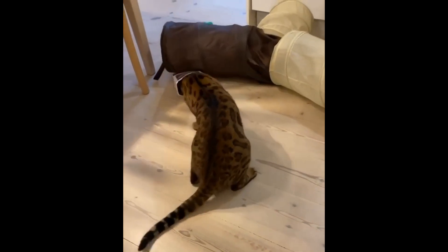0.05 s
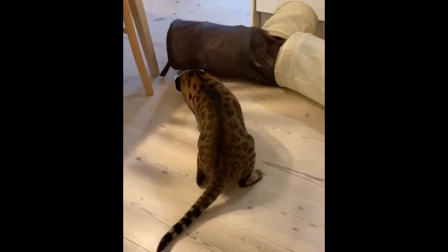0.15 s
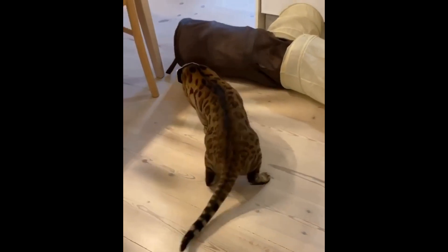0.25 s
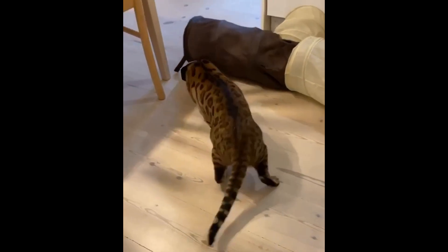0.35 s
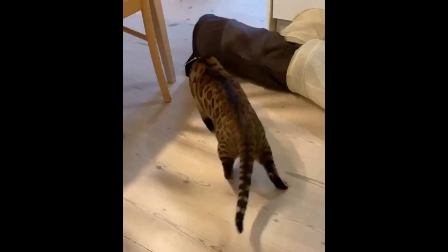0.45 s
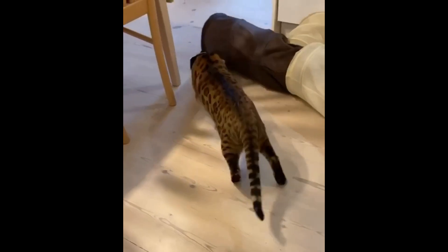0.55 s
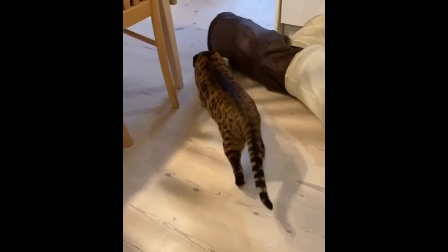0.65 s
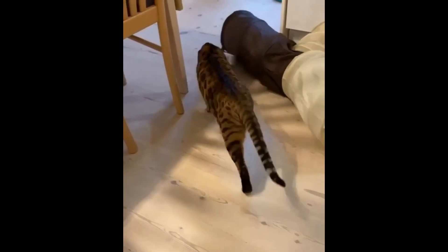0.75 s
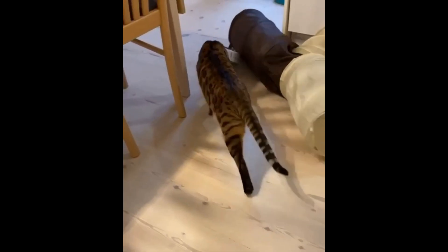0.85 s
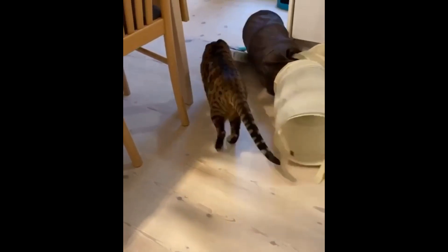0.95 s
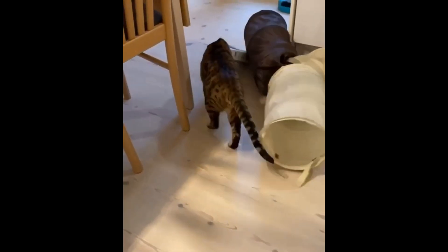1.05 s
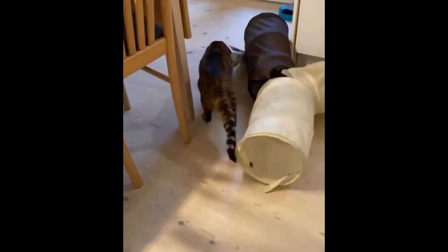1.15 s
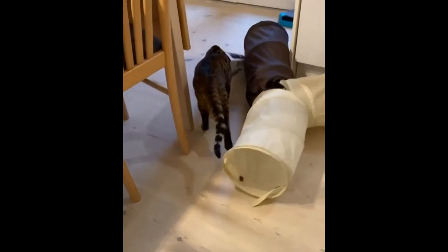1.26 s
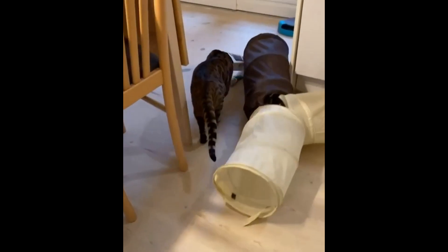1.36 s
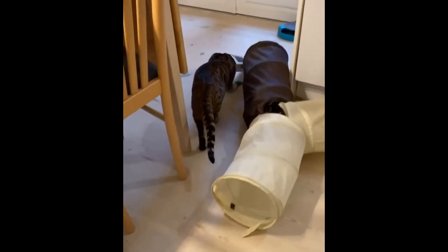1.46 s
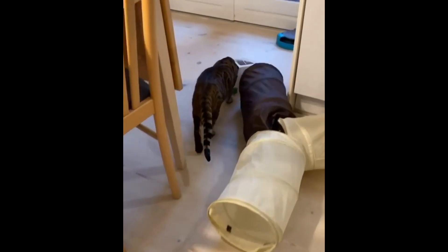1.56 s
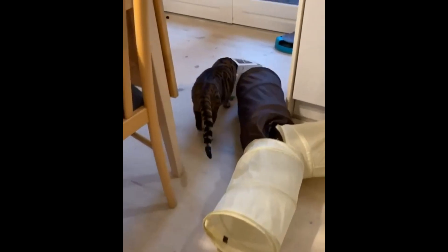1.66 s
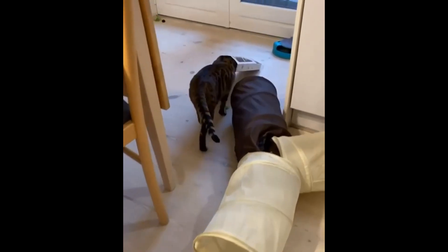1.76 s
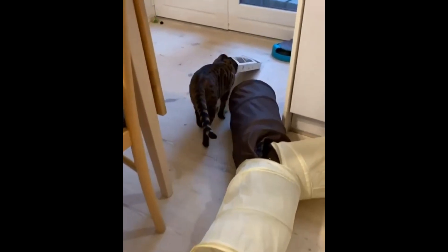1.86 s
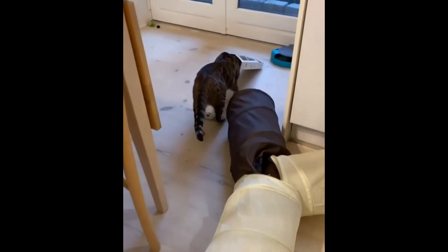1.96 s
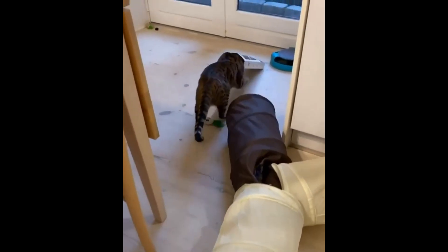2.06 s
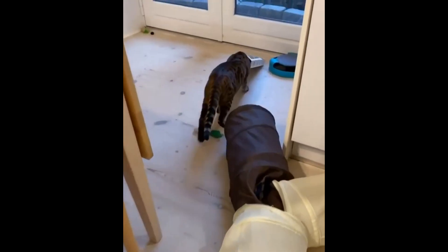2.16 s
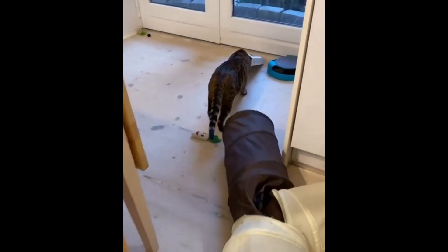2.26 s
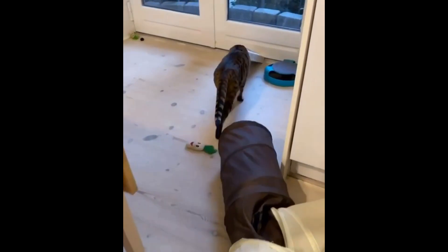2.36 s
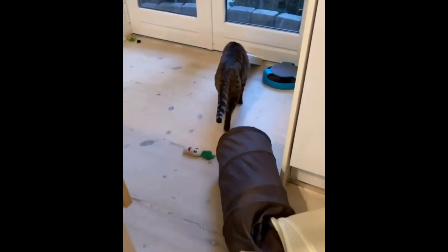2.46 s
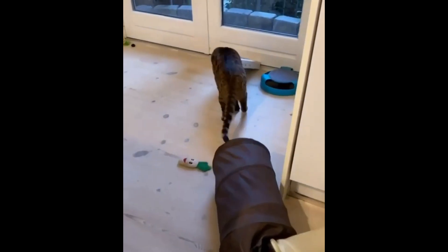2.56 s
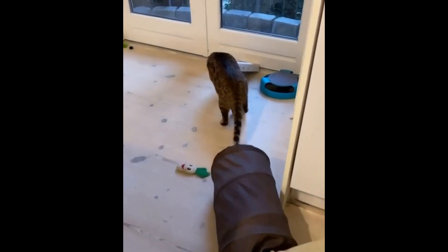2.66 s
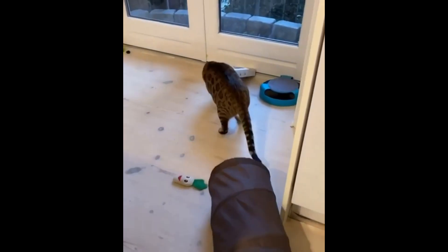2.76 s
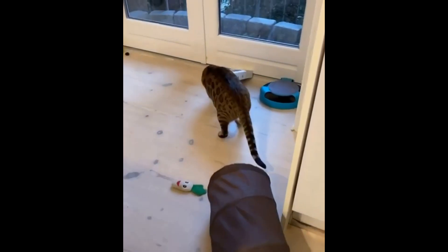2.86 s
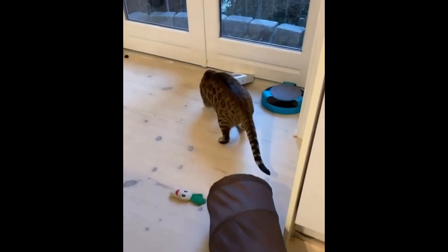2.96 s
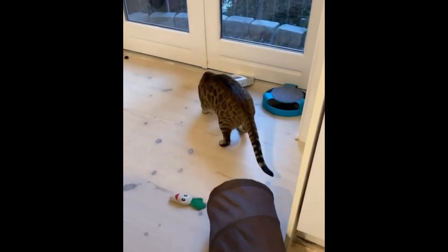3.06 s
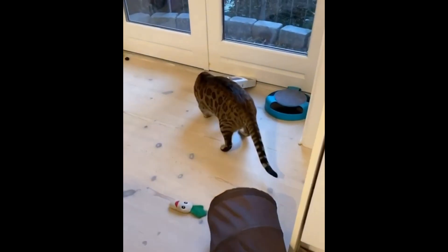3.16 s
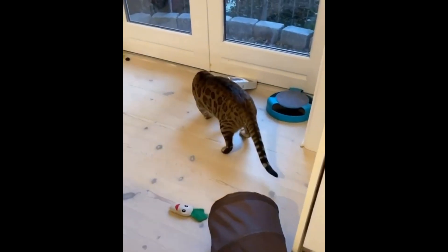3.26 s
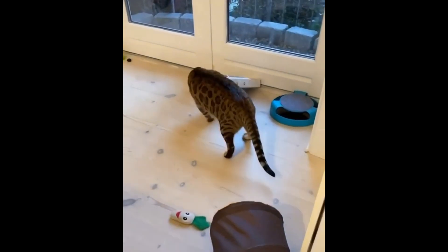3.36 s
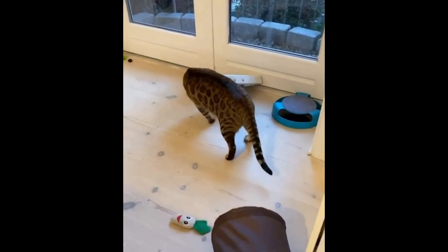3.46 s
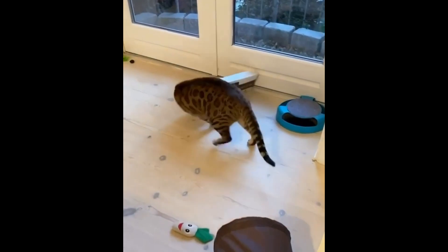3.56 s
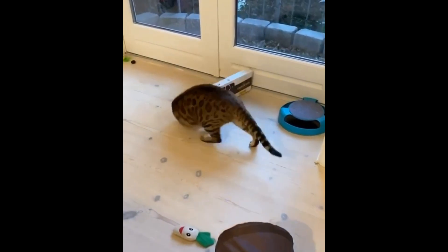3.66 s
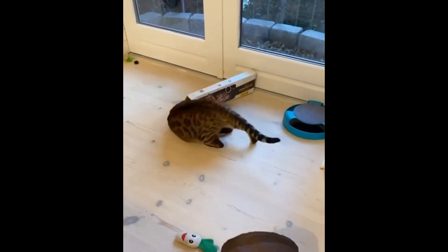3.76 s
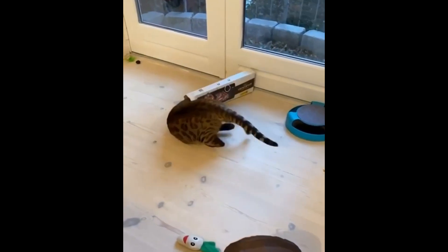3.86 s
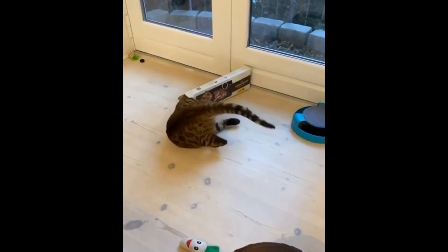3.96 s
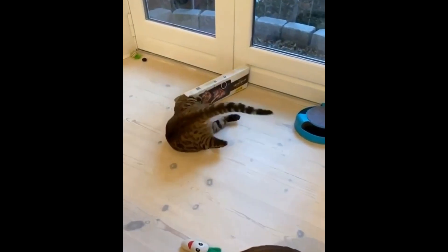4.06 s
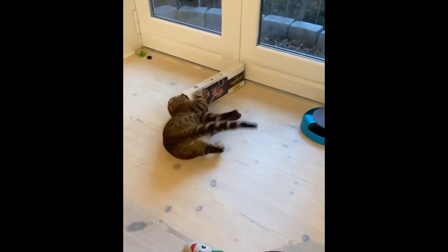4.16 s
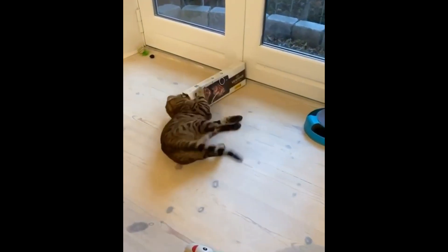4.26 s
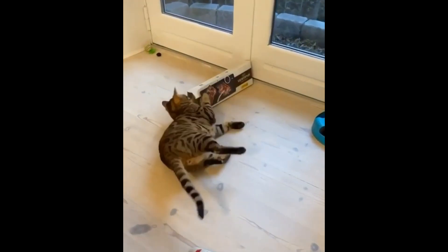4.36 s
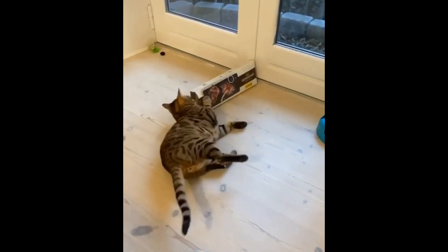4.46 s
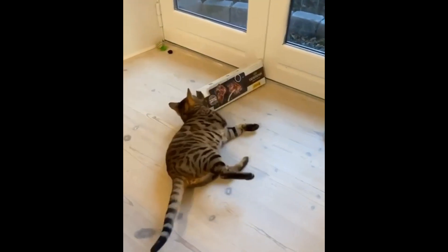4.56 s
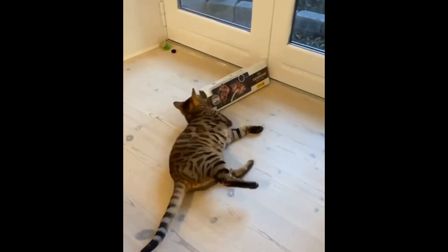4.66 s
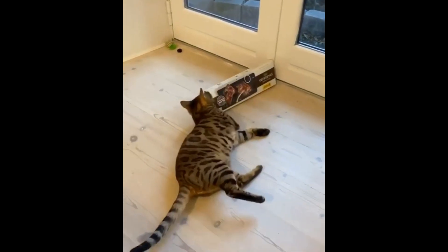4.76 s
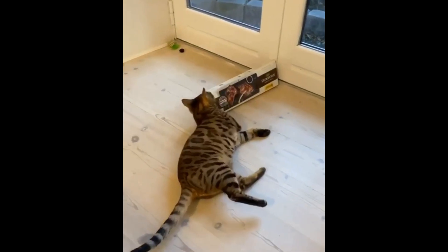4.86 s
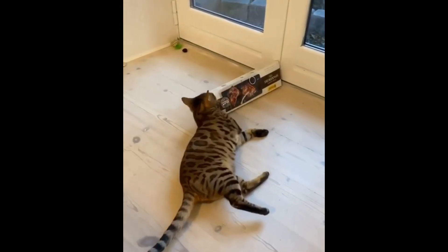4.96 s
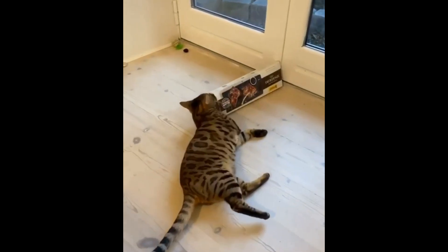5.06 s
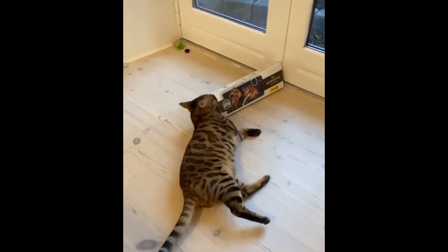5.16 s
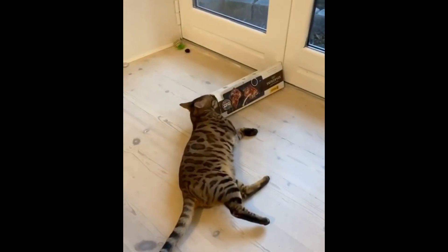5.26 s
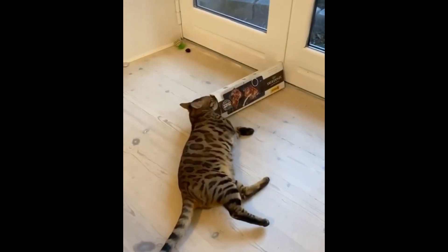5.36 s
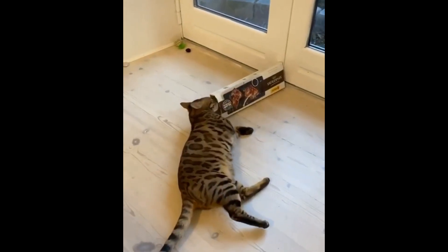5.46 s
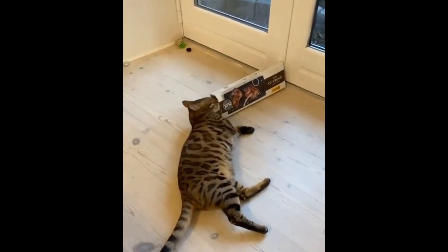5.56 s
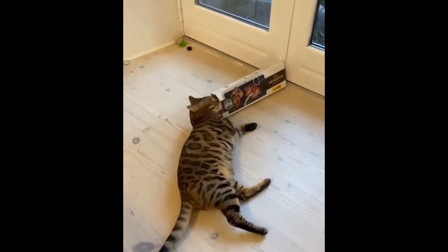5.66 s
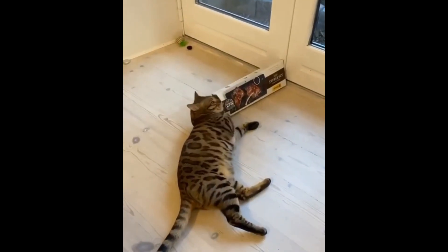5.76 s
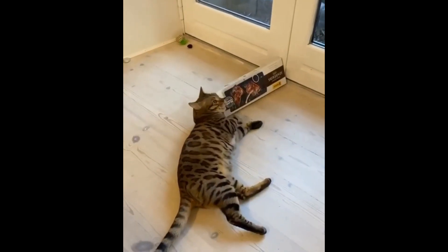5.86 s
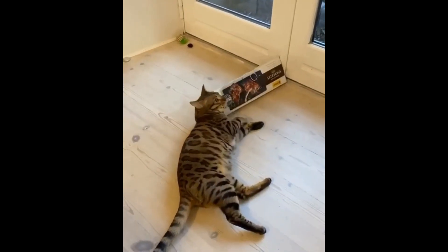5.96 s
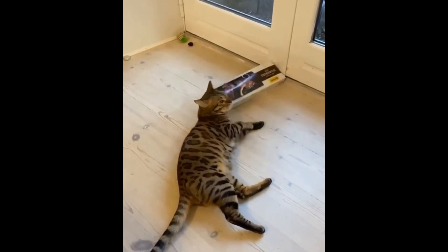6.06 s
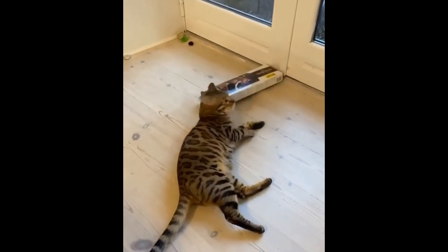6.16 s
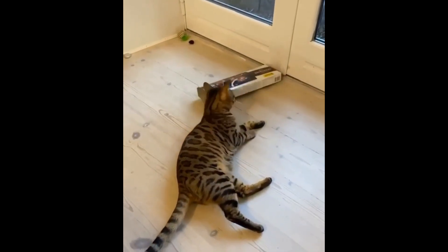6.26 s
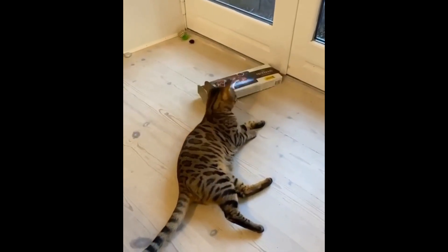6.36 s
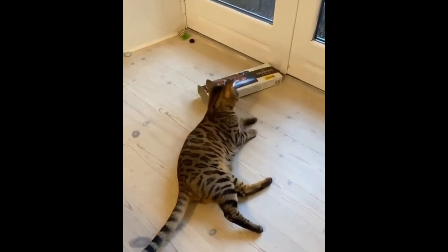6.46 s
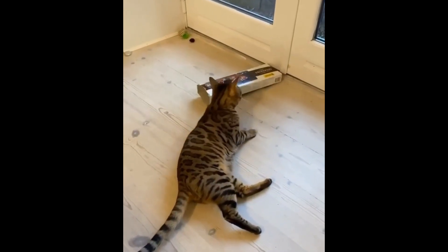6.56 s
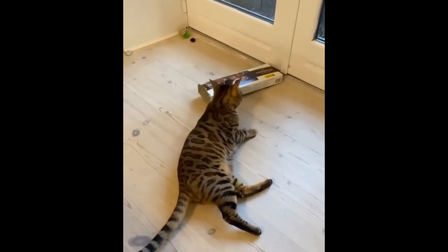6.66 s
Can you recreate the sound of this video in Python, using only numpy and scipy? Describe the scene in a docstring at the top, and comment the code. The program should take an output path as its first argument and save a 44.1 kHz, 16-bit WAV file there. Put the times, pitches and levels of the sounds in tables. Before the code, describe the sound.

A cat shoves a cardboard box across a wooden floor indoors, with soft scuffs, paw thuds and separate hollow knocks.

```python
"""A bare, lively room with a wooden floor, where a cat shoves a flat cardboard box past a fabric tunnel.
The box scuffs along in stick-slip strokes, knocks down on the boards, hits a door and topples over:
each hit is a dead slap, with the hollow body and the floor ringing under it. Paws thud, claws tick
on the card, fur and fabric rustle, all over a bed of room air and a faint appliance hum."""
import sys
import numpy as np
from scipy import signal
from scipy.fft import rfft, irfft
from scipy.io import wavfile
from scipy.ndimage import uniform_filter1d

SR = 44100
rng = np.random.default_rng(int(sys.argv[2]) if len(sys.argv) > 2 else 0)


def transcribe(signal):
    """Save signal, clipped to [-1, 1], as a 16-bit WAV file at the path in sys.argv[1]."""
    frames = np.atleast_2d(signal).T
    limited = np.clip(frames, -1, 1)
    pcm = np.round(limited * 32767).astype(np.int16)
    wavfile.write(sys.argv[1], SR, pcm)


N = 296352

# box hits: t/s, slap level/dB, treble corner/Hz, roll-off order, contact/s, floor ring/dB,
# body ring/dB, body focus/Hz
KNOCK_CUES = [(0.7303, -14, 2000, 2, 0.027, -72, -42, 475), (.737, -16.5, 900, 2, 0.048, -75, -37.5, 154),
              (0.802, -22.5, 1950, 2, 0.014, -59, -61, 170), (1.67, -21, 3440, 2, 0.0071, -44, -49, 600),
              (1.678, -11, 3500, 2.6, 0.0055, -36, -57, 600), (1.693, -16, 2350, 2, 0.016, -49, -30, 334),
              (2.483, -9, 1060, 2, 0.024, -46, -29.5, 201), (2.489, -7, 950, 1.8, 0.011, -53, -31.5, 122),
              (2.515, -12, 900, 2, 0.0041, -33.5, -29.5, 406),
              (2.898, -28.5, 1810, 2, 0.0044, -65, -52, 336),
              (3.7467, -4.5, 2800, 4, 0.0032, -47, -41, 1700),
              (3.7548, 2.5, 1250, 2.8, 0.0035, -29, -18.5, 617),
              (3.755, -11, 706, 3, 0.0059, -42, -27, 252),
              (3.777, -5.5, 2180, 3.8, 0.03, -25.5, -18.5, 161),
              (3.824, -20, 890, 3, 0.0052, -59, -28, 591), (6.153, -27, 3630, 2, 0.011, -73, -45.5, 1614),
              (6.251, -41, 800, 2, 0.0051, -60, -36.5, 184), (6.263, -14.5, 5500, 2, 0.0042, -63, -24, 340),
              (6.283, -11.5, 3380, 2, 0.0064, -42, -24.5, 415),
              (6.292, -29, 700, 2, 0.0093, -41, -36.5, 162), (6.309, -12.5, 2170, 2, 0.026, -40, -28, 258),
              (6.5229, -17.5, 950, 4, 0.0022, -69, -47, 740),
              (6.538, -13.5, 495, 3, 0.0095, -66, -33.5, 330),
              (6.668, -47.5, 3000, 1.5, 0.0031, -68, -46.5, 325)]
# dead slap of card on wood: f/Hz, level/dB
SLAP_EQ = [(25, -25.5), (55, -31.5), (90, -4.5), (200, -2), (400, -3), (800, -4.5), (1500, -8.5),
           (3000, -11), (6000, -13), (9000, -15.5), (11500, -22), (12500, -37.5)]
# boxy colour on slaps, cracks and scratches: f/Hz, width/Hz, lift/dB
HOLLOW_PEAKS = [(560, 390, 3), (686, 87, 0.5), (970, 73, 2.5), (1190, 170, 1), (1860, 180, 2),
                (2060, 294, 1.5), (2600, 130, 1.5), (3200, 330, 0), (3650, 220, 1), (4170, 453, 0)]
# hollow body of the box: f/Hz, level/dB, t60/s
BODY_MODES = [(126, -2, 0.2), (156, 4, 0.19), (181.8, 0, 0.43), (196, -7.5, 0.41), (240, -2.5, 0.074),
              (259.8, -4, 0.2), (304, -15.5, 0.037), (338.3, 5.5, 0.14), (372, -7, 0.22),
              (399.4, -10, 0.24), (478.4, -11.5, 0.54), (522, -3, 0.15), (584, -20.5, 0.086),
              (599, -13, 0.25), (632.5, -2, 0.15), (679, -7.5, 0.26), (702, -5.5, 0.3), (750, 2.5, 0.18),
              (960, -14, 0.16), (1130, -2.5, 0.2), (1340, -5.5, 0.15), (1607, -2.5, 0.092)]
# floorboards: f/Hz, level/dB, t60/s
FLOOR_MODES = [(46.6, 5, 0.53), (75.7, 1.5, 0.42), (89.5, 4, 0.21), (107.1, 1.5, 0.16), (133.2, 2, 0.36),
               (161.2, -5, 0.3), (218, -4, 0.14), (244.7, -1.5, 0.19), (359, -25.5, .2)]
# corner hits: t/s, level/dB, f/Hz, width/octaves, card ring/dB, card focus/Hz
CRACK_CUES = [(0.7304, -20, 1210, 1.2, -45.5, 1790), (1.438, -25, 850, 0.4, -50, 816),
              (1.6777, -11, 2700, 0.42, -44, 3000), (1.69, -10.5, 3680, 0.58, -40.5, 1310),
              (2.488, -12, 875, 0.42, -40, 920), (2.857, -30.5, 2350, 1.06, -77, 2370),
              (2.896, -29, 2440, 1.4, -63, 2210), (3.7465, 6, 1420, 0.37, -42, 1500),
              (3.7585, -13.5, 3000, 0.44, -49.5, 2000), (3.770, -8, 1810, 0.51, -36.5, 1760),
              (3.824, -19, 700, 0.49, -34, 610), (6.158, -25, 1900, 0.52, -47, 1800),
              (6.1605, -14, 4900, 0.28, -60, 4150), (6.164, -30, 900, 0.33, -52, 870),
              (6.2622, -11, 1700, 1.8, -36, 740), (6.3003, -16, 2830, 0.87, -54, 3400),
              (6.3105, -18, 3920, 0.84, -43.5, 3200), (6.329, -21, 2500, 1.4, -42.5, 740)]
# stiff card panels: f/Hz, level/dB, t60/s
CARD_MODES = [(597, -4, 0.2), (674, 1, 0.39), (724, 2, 0.3), (787, 1, 0.24), (952, 6, 0.22),
              (1025, -5, 0.15), (1326, 2.5, 0.11), (1670, 0, 0.16), (1840, 0, 0.15), (2035, -1, 0.18),
              (2270, -4, 0.18), (2600, -5.5, 0.11), (3236, -1, 0.12), (4150, 0.5, 0.087)]
# the cat pushes the box: t/s, length/s, level/dB, swell/dB, grit relative to level/dB, pitch factor
SHOVE_CUES = [(-0.04, 0.4, -56.5, -2, -12.5, 0.93), (0.392, 0.17, -58, 5.5, -14, 0.95),
              (0.56, 0.13, -59, 4.5, -12, 0.85), (0.77, 0.28, -59, 5.5, -8.5, 0.9),
              (1.056, 0.12, -52, 4.5, -13, 0.91), (1.264, 0.16, -57.5, 5.5, -10.5, 1.05),
              (1.417, 0.082, -54, 0.5, -25, 0.87), (1.777, 0.27, -55, -15.5, -26, 0.91),
              (2.215, 0.65, -64.5, -16.5, -2.5, 1.02), (2.92, 0.091, -65, 5, -8, 1.12),
              (3.13, 0.034, -67, -1.5, -12, 1), (3.394, 0.38, -69.5, 18.5, -12.5, 0.96),
              (4.008, 0.085, -57, 1, -12.5, 0.93), (4.146, 0.16, -57, -8.5, -12.5, 0.9),
              (4.689, 0.06, -73, 5, -5.5, 0.86), (5.219, .04, -75.5, 4, -25, 0.92),
              (5.799, 0.94, -70.5, 5, -17.5, 0.98), (6.195, 0.07, -58.5, 3, -4.5, 1.56),
              (6.486, 0.065, -58, -2, -14, 0.78)]
# panel resonances of the sliding box: f/Hz, width/Hz, level/dB
SLIDE_BANDS = [(383, 220, -4), (595, 347, 4), (812, 242, 3.5), (1100, 550, -7)]
# fine scratch under the card: f/Hz, level/dB
SCRATCH_EQ = [(500, -7.5), (1100, 10), (1600, 7), (2500, 2), (4000, -3.5), (7000, -36)]
# single coarse grains: f/Hz, level/dB
GRIT_EQ = [(400, -11), (1200, -1), (3000, -3), (6000, -7), (11000, -16.5), (12500, -40)]
# boards under a load: f/Hz, level/dB
RUMBLE_EQ = [(25, -8), (55, -7), (90, 0.5), (150, -1.5), (250, -1), (400, -5.5), (700, -10.5), (2000, -53)]
# the card catches and judders: peak t/s, half length/s, level/dB, f/Hz, width/Hz, glide/(octaves/s)
SCUFF_CUES = [(0.495, 0.06, -58, 783, 98, 0.36), (0.726, 0.0065, -55, 1820, 2600, 0.52),
              (1.054, 0.0085, -57, 3200, 1300, 0), (1.059, 0.011, -67, 5400, 2000, 0),
              (1.125, 0.027, -50, 510, 130, 0.45), (1.158, 0.012, -47, 866, 290, -0.065),
              (1.447, 0.01, -46, 790, 310, -1.2), (1.485, 0.025, -56.5, 855, 300, -1.4),
              (2.512, 0.023, -56, 2930, 3700, -2), (2.99, 0.039, -65, 915, 88, -0.65),
              (3.172, 0.036, -63.5, 588, 149, -0.18), (3.532, 0.053, -62.5, 718, 131, 0.78),
              (3.699, 0.005, -53.5, 870, 410, 0), (4.071, 0.013, -51, 484, 130, -0.32),
              (4.6, 0.044, -82, 4500, 2600, -0.17)]
# the cat brushes past: t/s, length/s, level/dB, swell/dB, rumble of its weight/dB
BRUSH_CUES = [(-0.04, 0.42, -77, -7, -60.5), (0.33, 0.62, -76, 5.5, -71.5), (1.003, 0.26, -62, -3, -59),
              (1.263, 0.44, -73, 5, -65), (1.42, 0.03, -71, 0, -70), (1.82, 0.26, -75.5, -3, -61),
              (2.098, 0.13, -74, -0.5, -65), (2.227, 0.4, -75.5, 1.5, -58), (2.706, 0.25, -86, -2, -62.5),
              (2.872, 0.026, -68.5, -3, -54), (2.988, 0.4, -88, -8, -63.5), (3.315, 0.98, -82.5, 6.5, -72),
              (3.756, 0.11, -63, -6.5, -84), (4.21, 0.08, -69, -2.5, -60), (4.407, 0.26, -83.5, -4.5, -74),
              (4.678, 0.054, -79, 0.5, -69), (4.872, 0.047, -83.5, 0.5, -73.5),
              (5.233, 0.052, -90.5, 1.5, -83.5), (5.795, 0.14, -86.5, 5, -80.5),
              (5.942, 0.18, -75, 13, -93), (6.221, 0.05, -66, 6, -48), (6.645, 0.021, -74.5, 0.5, -65)]
# fur and tunnel fabric: f/Hz, level/dB
RUSTLE_EQ = [(1500, -22.5), (3500, -7), (5000, 1.5), (7000, 1), (9500, 1), (11600, -1.5), (12400, -30)]
# paw falls and body bumps: t/s, level/dB, focus/Hz
PAW_CUES = [(0.163, -61, 152), (0.482, -53, 163), (0.93, -54, 125), (1.031, -50, 154), (1.219, -47.5, 117),
            (1.627, -54, 129), (1.91, -52, 110.4), (2.256, -50, 245), (2.308, -46.5, 245), (2.66, -43, 235),
            (2.926, -45, 96), (2.99, -49.5, 180), (3.13, -57.5, 175), (3.441, -56, 176),
            (4.015, -45, 116.3), (4.07, -45, 125.7), (4.194, -42.5, 199), (4.249, -52, 161),
            (4.504, -56, 68.5), (4.793, -57.5, 80.6), (5.52, -59.5, 132), (6.425, -52, 131)]
# claws and card edges click: t/s, level/dB, focus/Hz
TICK_CUES = [(2.896, -61, 4350), (3.749, -41.5, 6900), (3.753, -44.5, 9400), (6.1589, -35.5, 4800),
             (6.161, -47, 9000), (6.2619, -30, 7750), (6.2636, -30.5, 5900), (6.267, -41, 8200),
             (6.273, -43, 7600)]
# stiff edge of the card: f/Hz, level/dB, t60/s
EDGE_MODES = [(3810, -16, 0.008), (4580, -4, 0.011), (4974, -3, 0.018), (5770, 0, 0.013),
              (6750, -3.5, 0.006), (7470, -3.5, 0.016), (8550, -5, 0.016), (9640, -1.5, 0.012),
              (10890, 14, 0.017), (11600, 8, 0.012), (12600, 3.5, 0.005)]
# still room air: f/Hz, level/dB
AIR_EQ = [(20, -26), (50, 2.5), (100, 0.5), (160, -6), (250, -9.5), (500, -11), (800, -19), (1500, -26.5),
          (5000, -35.5), (11500, -42.5)]
# appliance partials: f/Hz, level/dB
HUM_PARTIALS = [(150.7, -80), (301.5, -86), (597.5, -80)]
# reverb time of the room: f/Hz, t60/s
ROOM_DECAY = [(60, 0.59), (200, 0.41), (600, 0.47), (1500, 0.47), (4000, 0.5), (8000, 0.45), (12000, 0.19)]
# likeness of the two microphones: f/Hz, left-right correlation
STEREO_LIKENESS = [(60, 1), (190, 0.87), (290, 0.55), (500, -0.034), (1000, -0.25), (2000, 0.041),
                   (6000, 0.16), (9000, 1)]
# lean of the stereo image: f/Hz, left minus right/dB
LEFT_TILT = [(100, -1), (500, 1.76), (2000, 1), (4500, 2.5), (8000, 0.1)]


def knocks(crunch=1.44, slap_db=18, click_db=-33, uneven_db=4.5):
    """The box lands edge by edge: tiny impacts slap the floor, ring the body and shake the boards."""
    out, t = np.zeros((2, N)), np.arange(SR) / SR
    hz = np.fft.rfftfreq(4096, 1 / SR)
    for s, db, corner_hz, roll_off, contact_s, floor_db, body_db, focus_hz in KNOCK_CUES:
        impacts = sparse_noise(SR, per_s=3000) * np.exp(-t / contact_s)
        force = crunch * impacts / (np.linalg.norm(impacts) + 1e-9)
        force[0] += 1  # first contact
        hardness = np.hypot(1, hz / corner_hz) ** -roll_off + amp(click_db)
        slap = amp(db + slap_db + curve(SLAP_EQ, hz)) * hollow(hz) * struck_panel(hz) * hardness
        # the panels beam their treble unevenly towards the listener
        ripple = unit(uniform_filter1d(rng.standard_normal(len(hz)), size=24))
        beaming = amp(uneven_db * ripple * hz / (hz + 800))
        direct = signal.fftconvolve(force / np.linalg.norm(force), impulse(slap * beaming))
        add(out, s, amp(-5.5) * direct[None])
        # the reverb blooms more slowly after a long contact
        add(out, s, room(np.r_[impulse(slap), np.zeros(SR)], direct_db=-31, build_s=0.75 * contact_s))
        add(out, s, amp(body_db) * ring(BODY_MODES, focus_hz, reach=0.11, rise_s=0.0037))
        add(out, s, amp(floor_db) * ring(FLOOR_MODES, focus_hz=95, reach=0.46, rise_s=0.016))
    return out


def cracks(direct_db=-6.5):
    """A stiff corner strikes: a sharp crack, and the card panels ring on after it."""
    out, hz = np.zeros((2, N)), np.fft.rfftfreq(4096, 1 / SR)
    for s, db, centre_hz, octaves, ring_db, focus_hz in CRACK_CUES:
        band = np.exp(-(np.log2((hz + 1) / centre_hz) / octaves) ** 2) + amp(-39.5)
        crack = impulse(amp(db) * hollow(hz) * struck_panel(hz) * band)
        add(out, s, amp(direct_db) * crack[None])
        add(out, s, room(np.r_[crack, np.zeros(SR)], direct_db=-25.5))
        add(out, s, amp(ring_db) * ring(CARD_MODES, focus_hz, reach=0.25, rise_s=0.001))
    return out


def hollow(hz):
    """Gain of the broad peaks that make the card sound boxy."""
    return amp(sum(db / (1 + (2 * (hz - centre) / width) ** 2) for centre, width, db in HOLLOW_PEAKS))


def struck_panel(hz, depth_db=3, above_hz=900):
    """A fresh EQ per hit: each spot on the card wakes its own crowd of small, damped resonances."""
    peaks = unit(uniform_filter1d(uniform_filter1d(rng.standard_normal(len(hz)), size=12), size=8))
    return unit(amp(depth_db * peaks * hz / np.hypot(hz, above_hz)))


def strokes():
    """Stick-slip drives panels and boards; grit scratches under the card, fur and fabric rustle."""
    slide_gain, rustle_gain, scratch_gain, rumble_gain, pitch = movements()
    chatter = moving_room(slips(per_s=900, spread_db=1.5), direct_db=-14)
    panels = sum(amp(db) * resonate(chatter, hz * pitch, width) for hz, width, db in SLIDE_BANDS)
    texture, grip = crackle(), flutter()
    scrape = irfft(rfft(colour(texture, SCRATCH_EQ)) * hollow(bins(texture)), N)
    grains = room(colour(slips(per_s=240, spread_db=-1), GRIT_EQ), direct_db=-12.5)
    # a tighter grip ducks the scrape and lifts the rustle a touch
    scratch = unit(amp(-2 * grip) * scrape) + amp(-3.5) * unit(grains)
    rustle = amp(-2 + 0.5 * grip) * unit(colour(texture, RUSTLE_EQ)) + amp(-6) * unit(crinkles())
    slide = amp(-2.5) * unit(panels)
    rumble = amp(-1.5) * unit(colour(chatter, RUMBLE_EQ))
    return slide_gain * slide + rustle_gain * rustle + scratch_gain * scratch + rumble_gain * rumble


def movements():
    """Fader rides for slide, rustle, scratch and rumble, and the pitch bend of the sliding box."""
    shoves = envelopes(SHOVE_CUES, attack_s=0.024, t60=0.63)
    brushes = envelopes(BRUSH_CUES, attack_s=0.03, t60=0.59)
    start, length, shove_db, _, grit_db, pitch = np.transpose(SHOVE_CUES)
    _, _, brush_db, _, weight_db = np.transpose(BRUSH_CUES)
    slide, rustle = power_sum(shoves, shove_db), power_sum(brushes, brush_db)
    scratch = np.hypot(power_sum(shoves, shove_db + grit_db), amp(-0.5) * rustle)  # fabric scratches too
    rumble = np.hypot(power_sum(brushes, weight_db), amp(-6) * slide)  # shoves drag on the boards
    return slide, rustle, scratch, rumble, np.interp(np.arange(N) / SR, start + length / 2, pitch)


def envelopes(cues, attack_s, t60):
    """One gain per move: an attack, softer for long moves, a hold that swells or fades, a release."""
    start, length, _, swell_db = np.transpose(cues)[:4, :, None]
    t = np.arange(N) / SR - start
    attack = np.clip(t / (attack_s + 0.034 * length), 0, 1)
    hold_db = swell_db * np.clip(t / length, 0, 1)
    return attack * amp(hold_db - 60 * np.maximum(t - length, 0) / t60)


def slips(per_s, spread_db, clump_db=0):
    """A rubbed surface lets go in tiny clicks of uneven size; clump_db bunches the loud ones."""
    clumps = unit(uniform_filter1d(rng.standard_normal(N), size=1000))
    size = amp(spread_db * np.minimum(rng.exponential(1, N), 4) + clump_db * clumps)
    return size * sparse_noise(N, per_s)


def flutter(hz=45):
    """Random wobble of the sliding card as it grips and lets go."""
    band = [(hz / 10, -20), (hz / 2, 0), (hz, 0), (2 * hz, -20), (10 * hz, -100)]
    return unit(colour(rng.standard_normal(N), band))


def crackle():
    """Creases and grit crackle, each in a band of its own."""
    bands = [signal.butter(1, [hz, hz + 1200], "bandpass", fs=SR) for hz in np.linspace(600, 10600, 10)]
    clicks = sum(signal.lfilter(*band, slips(per_s=600, spread_db=0, clump_db=1.5)) for band in bands)
    return moving_room(clicks, direct_db=-15)


def crinkles(count=800, low_hz=1500, top_hz=10500, width_hz=380, spread_db=6.5):
    """Creases of card and fabric pop one by one, each with its own size and brief pitch."""
    out, t = np.zeros((1, N)), np.arange(512) / SR
    for when, pitch, chance in rng.random((count, 3)):
        size = amp(spread_db * min(-np.log(1 - chance), 3))
        hz = low_hz + pitch * (top_hz - low_hz)
        pop = size * np.exp(-np.pi * width_hz * t) * np.sin(2 * np.pi * hz * t)
        add(out, when * N / SR, pop[None])
    return room(out[0], direct_db=4.5)


def scuffs(wet_db=0.5):
    """A quick run of slips makes one panel of the box sing."""
    out, t = np.zeros((2, N)), np.arange(SR) / SR - 0.2
    for s, half_s, db, hz, width, glide in SCUFF_CUES:
        judder = diffuse(sparse_noise((2, SR), per_s=1500))
        pitch = hz * 2 ** (glide * t)
        swell = np.exp(-(t / half_s) ** 2 / 2)
        tone = swell * np.array([resonate(side, pitch, width) for side in judder])
        tone = amp(db) * unit(tone) * np.sqrt(np.mean(swell ** 2))
        add(out, s + t[0], tone + amp(wet_db) * room(tone[0], direct_db=-27.5))
    return out


def paws():
    """Soft pads push a low thud out of the floorboards."""
    out = np.zeros((2, N))
    for s, db, focus_hz in PAW_CUES:
        add(out, s, amp(db) * ring(FLOOR_MODES, focus_hz, reach=0.31, rise_s=0.0066))
    return out


def ticks(wet_db=-9):
    """Claws and card edges click brightly, one sample later on the right, with a little reverb."""
    out = np.zeros((2, N))
    for s, db, focus_hz in TICK_CUES:
        left, right = amp(db) * ring(EDGE_MODES, focus_hz, reach=0.099, rise_s=0.00016)
        add(out, s, np.array([left, np.r_[0, right[:-1]]]))
        add(out, s, amp(wet_db) * room(np.r_[left, np.zeros(SR)], direct_db=-16.5))
    return out


def room_tone(air_db=-70.5, waver_rad=0.18):
    """The bed: still air and the slightly wavering hum of an appliance."""
    t = np.arange(N) / SR
    air = amp(air_db) * unit(colour(diffuse(rng.standard_normal((2, N))), AIR_EQ))
    drift = waver_rad * unit(colour(rng.standard_normal(N), [(2, 0), (8, -15), (30, -90)]))
    hum = sum(amp(db) * np.sqrt(2) * np.sin(2 * np.pi * hz * t + drift) for hz, db in HUM_PARTIALS)
    return air + hum


def room(x, direct_db, early_db=8, early_t60=0.074, build_s=0.001):
    """Direct sound, a burst off the near walls and a longer tail; fresh reflections for every spot."""
    size = SR // 2
    reflections = diffuse(sparse_noise((2, size), per_s=0.15 * SR))
    hz, t, spectra = signal.stft(reflections, SR, nperseg=256)
    decay = np.hypot(amp(-60 * t / curve(ROOM_DECAY, hz)[:, None]), amp(early_db - 60 * t / early_t60))
    bloom = 1 - np.exp(-np.arange(size) / SR / build_s)
    tail = signal.istft(spectra * decay, SR, nperseg=256)[1][:, :size] * bloom
    response = tail / np.sqrt(np.sum(tail ** 2) / 2)
    response[:, 0] += amp(direct_db)
    return signal.fftconvolve(x[None], response, axes=1)[:, :len(x)]


def moving_room(x, direct_db, turns_per_s=1.7):
    """The source moves, so four patterns of reflections crossfade in turn."""
    turns = turns_per_s * np.arange(N) / SR
    sends = [np.maximum(np.cos(2 * np.pi * (turns + start)), 0) for start in (0, 0.25, 0.5, 0.75)]
    return sum(room(x * send, direct_db) for send in sends)


def diffuse(pair):
    """A diffuse field: the lows reach both microphones alike, the mids spread wide."""
    a, b = rfft(pair)
    alike = np.clip(curve(STEREO_LIKENESS, bins(pair)), -1, 1)
    mid, side = a * np.sqrt((1 + alike) / 2), b * np.sqrt((1 - alike) / 2)
    return irfft(np.array([mid + side, mid - side]), pair.shape[-1])


def ring(modes, focus_hz, reach, rise_s):
    """Dying modes; a hit mostly wakes those within reach (octaves) of its focus."""
    hz, db, t60 = np.transpose(modes)[:, :, None]
    t = np.arange(0, min(1.2 * t60.max(), 1), 1 / SR)
    weight = amp(db) / (1 + (np.log2(hz / focus_hz) / reach) ** 2)
    swing = weight / np.linalg.norm(weight) * amp(-60 * t / t60) * (1 - np.exp(-t / rise_s))
    # each mode has its own phase, and its own phase gap between the microphones
    phase = 2 * np.pi * (hz * t + rng.random(hz.shape))
    gap = np.arccos(np.clip(curve(STEREO_LIKENESS, hz), -1, 1)) * rng.choice([-1, 1], hz.shape)
    return np.array([np.sum(swing * np.sin(phase + side * gap / 2), 0) for side in (1, -1)])


def resonate(x, hz, width):
    """Two resonators in series, both riding the pitch curve hz."""
    turn, pole = np.exp(2j * np.pi * np.cumsum(hz) / SR), np.exp(-np.pi * width / SR)
    for _ in range(2):
        x = 2 * (turn * signal.lfilter([1 - pole], [1, -pole], x / turn)).real
    return x


def impulse(gain):
    """The tightest transient with this spectrum (minimum phase)."""
    log_gain = np.log(np.maximum(np.r_[gain, gain[-2:0:-1]], 1e-5))
    return np.fft.ifft(np.exp(np.conj(signal.hilbert(log_gain)))).real


def sparse_noise(shape, per_s):
    """Randomly scattered one-sample clicks."""
    return rng.standard_normal(shape) * (rng.random(shape) < per_s / SR)


def power_sum(gains, db):
    """Overlapping moves add in power, each at its own level."""
    return np.sqrt(amp(db) ** 2 @ gains ** 2 + 1e-20)


def amp(db):
    """Decibels to gain."""
    return 10 ** (np.asarray(db) / 20)


def unit(x):
    """Scales to rms 1."""
    return x / np.sqrt(np.mean(x ** 2) + 1e-20)


def curve(points, hz):
    """Joins (f/Hz, value) points on a log-frequency axis."""
    f, value = np.transpose(points)
    return np.interp(np.log(hz + 1), np.log(f + 1), value)


def bins(x):
    """Frequencies of the spectrum of x."""
    return np.fft.rfftfreq(x.shape[-1], 1 / SR)


def colour(x, points):
    """EQ drawn through (f/Hz, level/dB) points."""
    return irfft(rfft(x) * amp(curve(points, bins(x))), x.shape[-1])


def add(mix, s, sound):
    """Drops a sound into the stereo mix at time s."""
    part = mix[:, max(round(s * SR), 0):][:, :sound.shape[1]]
    part += sound[:, :part.shape[1]]


def scene():
    """The mix: box and cat over the room tone."""
    return knocks() + cracks() + paws() + ticks() + strokes() + scuffs() + room_tone()


def record(dry, cutoff_hz=12800):
    """The left microphone is a little brighter; a steep low-pass trims the top."""
    tilt_db = curve(LEFT_TILT, bins(dry)) / 2
    heard = irfft(rfft(dry) * amp(np.array([tilt_db, -tilt_db])), N)
    low_pass = signal.firwin(255, cutoff_hz, window=("kaiser", 8), fs=SR)
    return signal.oaconvolve(heard, low_pass[None], "same", axes=1)


dry = scene()
out = record(dry)
transcribe(out)
```